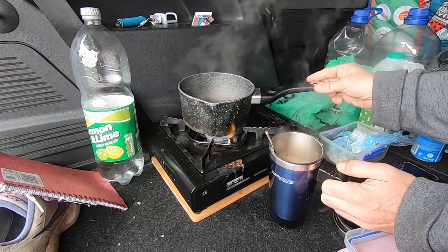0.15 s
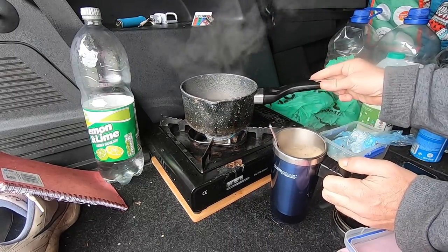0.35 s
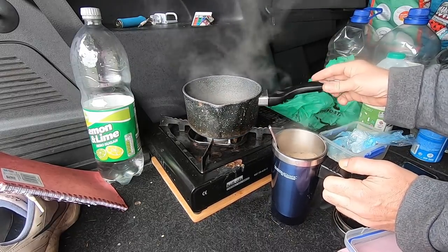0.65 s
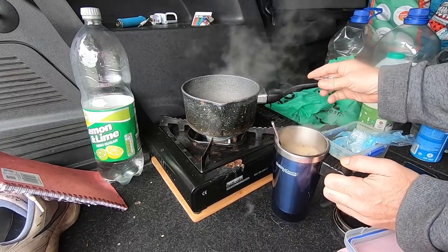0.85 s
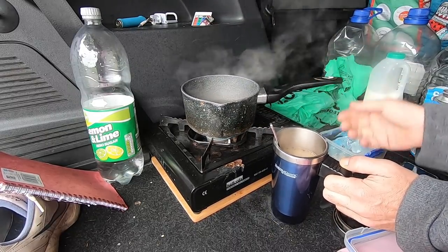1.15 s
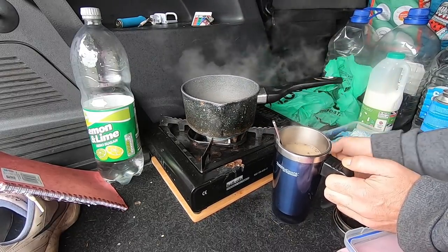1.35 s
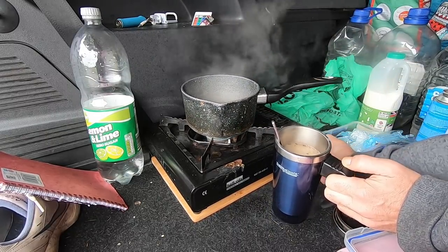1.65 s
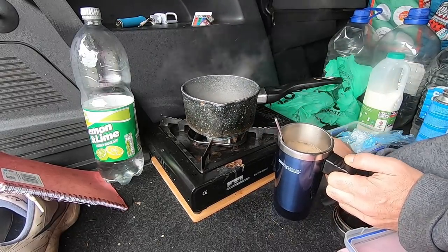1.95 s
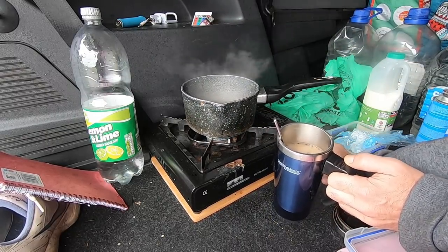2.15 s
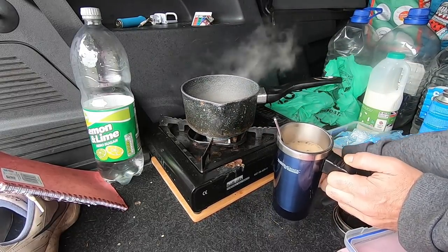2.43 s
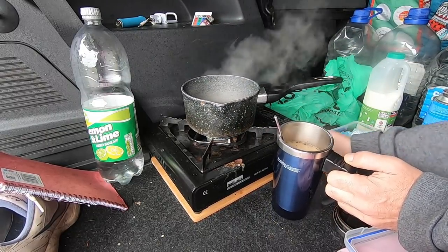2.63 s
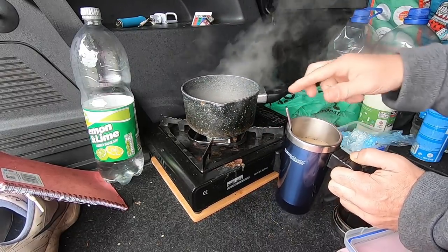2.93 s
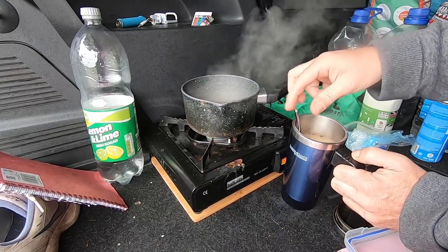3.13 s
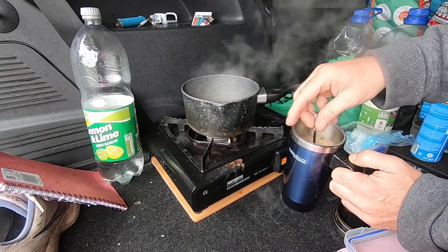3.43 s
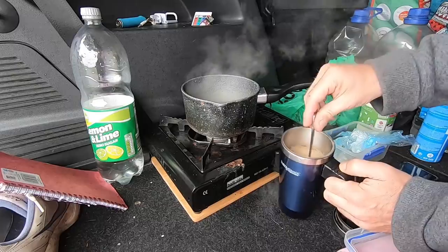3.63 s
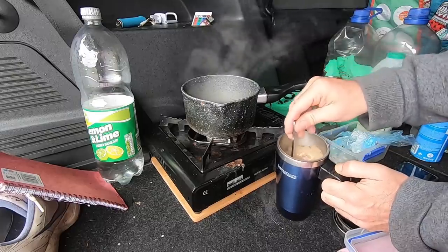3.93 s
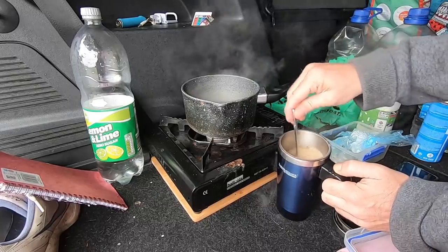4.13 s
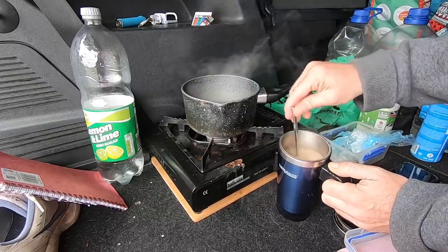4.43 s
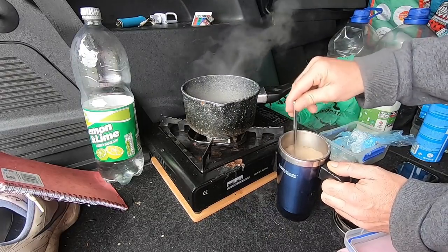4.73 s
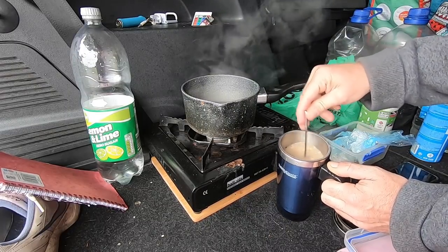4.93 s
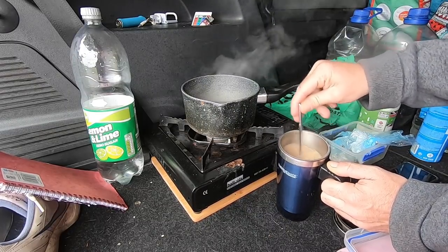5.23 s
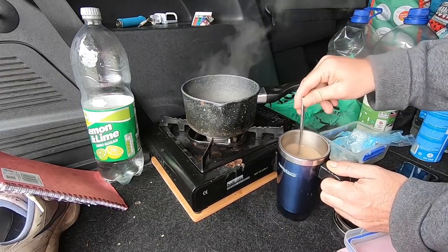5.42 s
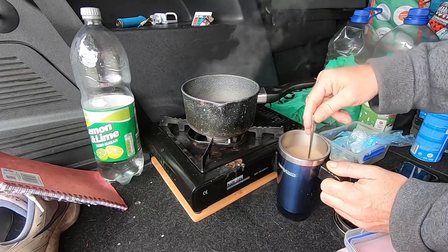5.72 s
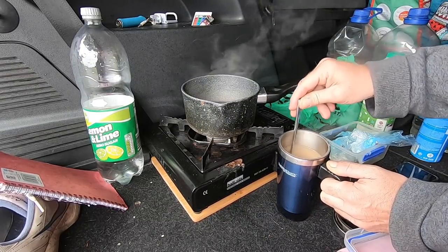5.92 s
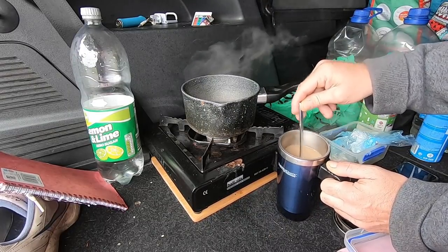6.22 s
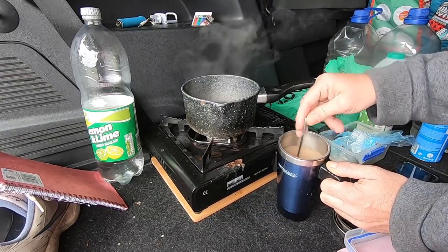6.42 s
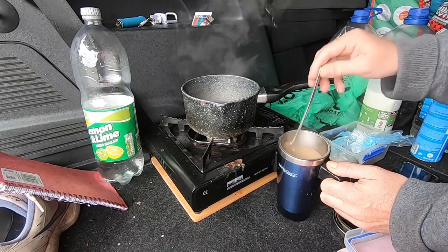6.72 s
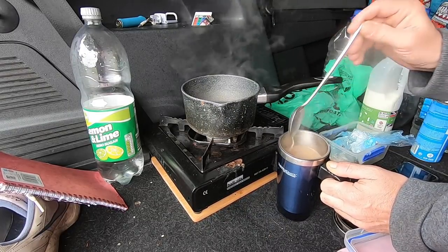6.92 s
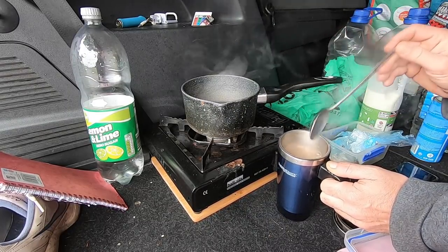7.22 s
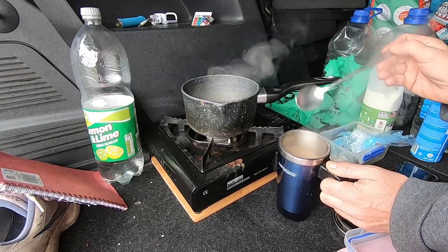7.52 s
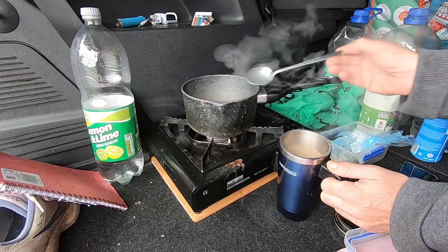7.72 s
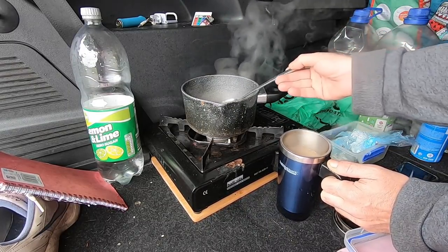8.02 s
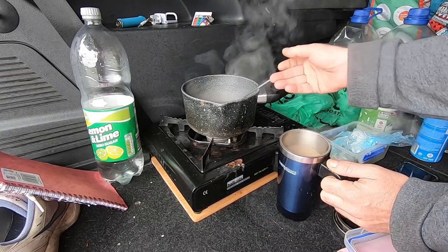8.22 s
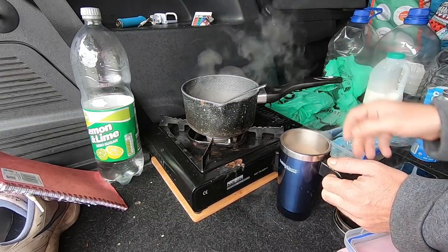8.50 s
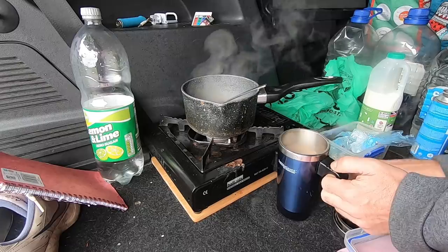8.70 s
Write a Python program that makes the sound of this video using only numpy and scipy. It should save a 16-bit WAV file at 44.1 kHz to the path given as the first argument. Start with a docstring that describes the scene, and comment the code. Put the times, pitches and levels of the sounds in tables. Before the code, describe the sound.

Close to a stereo microphone in a parked car's boot, a metal pan bumps and grates onto a camping stove during the first second, over a soft gas hiss. Around 2 seconds the knob clicks and the flame fades; at 2.6 a sprung lever snaps back, shaking the tin case. A sleeve brushes faintly just after 3 seconds. Slightly to the right, a spoon clinks in a steel mug and crunches through granules at about 3.8. From 4 to 7 seconds it stirs the drink, scraping, folding in small bubbles and knocking from wall to wall. Two ringing taps on the rim come at 7.2 and 7.5. From 8 to 8.6 seconds the spoon slides and clatters into the pan, slightly left. Underneath, the cabin air rumbles faintly and the floor gives a soft low boom with the knocks.

```python
"""A pan bumps and grates onto a hissing camping stove, close to a stereo microphone in a parked car's boot.
The knob turns, the flame dies and the sprung gas lever snaps back, shaking the tin case. A little to
the right a spoon crunches through granules in a steel mug and stirs, folding in bubbles and knocking
from wall to wall. It rings from two taps on the rim and is laid in the pan, on the left.
Under it all the cabin air rumbles faintly and the car floor booms with each blow."""
import sys
import numpy as np
from scipy import signal
from scipy.fft import rfft, irfft, next_fast_len
from scipy.io import wavfile

SR = 44100
rng = np.random.default_rng(int(sys.argv[2]) if len(sys.argv) > 2 else 0)


def inscribe(sig):
    """Save sig as 16-bit PCM at rate SR to the path in sys.argv[1].

    A 1-D sig is mono; a 2-D sig holds one channel per row.
    Samples are clipped to [-1, 1] before scaling.
    """
    pcm = np.round(np.clip(np.atleast_2d(sig).T, -1, 1) * 32767)
    wavfile.write(sys.argv[1], SR, pcm.astype(np.int16))


N = 390711

# Stereo width at the microphone: f/Hz, side minus mid/dB
STEREO_WIDTH = [(60, -5.5), (150, -2), (300, -12.5), (700, -6), (1500, -5), (4000, -12.5), (6000, -4.5),
                (8500, 0), (15000, 1)]
# Where each object stands before the microphone: name, left minus right/dB
LEFT_DB = {"pan": 1.8, "stove": .2, "mug": -3.4, "spoon": 2.8}
LOW_EDGE_HZ, HIGH_EDGE_HZ = 700, 3000   # borders of the low, middle and high registers

# Spectra of the still air, floor, sleeve and granules: f/Hz, relative level/dB
CABIN_COLOUR = [(15, -29.5), (25, 0), (95, -15), (186, -4.5), (573, -13.5), (856, -4.5), (1000, -16),
                (3730, -21.5), (15000, -41.5)]
BOOM_COLOUR = [(15, -34), (30, -17), (53, 0), (75, -6), (105, -10), (150, -26), (400, -70)]
SLEEVE_COLOUR = [(120, -61), (200, -13), (561, 5), (1690, -2.5), (2090, -15), (3380, -13), (6880, -32.5),
                 (14000, -67)]
GRANULE_COLOUR = [(53, -51), (90, -25), (276, 0.5), (350, 1.5), (515, -1), (883, -11), (1050, -1.5),
                  (2890, -6), (3580, 0.5), (4640, -11.5), (5510, -0.5), (7610, -19.5), (9440, -10),
                  (11500, -36), (15500, -38)]
# Each source's bed of dense resonances: f/Hz, relative level/dB
FLAME_COLOUR = [(53, -77), (90, -13), (157, 31.5), (488, 4), (579, -33), (870, 10.5), (969, -7),
                (1760, -1.5), (2480, -28.5), (3650, -34), (4520, -25), (9370, -26.5), (15000, -87.5)]
STOVE_COLOUR = [(53, -35.5), (90, -11.5), (222, -7), (350, -8.5), (494, -5), (538, -15.5), (828, -2),
                (1580, -2.5), (2710, -3), (9650, -24.5), (15500, -54)]
PAN_COLOUR = [(20, -29), (53, 3), (90, -0.5), (292, -5), (354, -0.5), (631, -7.5), (816, -1), (1250, -4),
              (1490, 0.5), (2010, -9), (3570, -17.5), (9500, -39.5), (12000, -57), (15000, -63)]
SPOON_PAN_COLOUR = [(53, -88), (90, -34), (301, -33.5), (365, -22.5), (639, -32), (846, -13), (1000, -23.5),
                    (1220, -14), (1690, -13.5), (2050, -20), (5510, -12), (7450, -19), (15500, -54.5)]
STIR_COLOUR = [(53, -59), (110, -53), (161, 6.5), (227, 8.5), (276, -4), (759, -14), (864, -47),
               (1580, -3.5), (1800, -12.5), (2710, 4), (4160, -6), (9240, -9), (15500, -40)]
MUG_COLOUR = [(47, -55.5), (80, -37.5), (162, 1.5), (287, -20.5), (569, -8.5), (1050, -9), (1260, 7.5),
              (1470, 6), (1790, -2), (1910, -7), (3100, -9), (4130, -15.5), (9340, -24), (15500, -59)]
RIM_COLOUR = [(53, -41.5), (90, -21.5), (165, -7.5), (328, -20), (398, -11), (483, -12.5), (793, -8.5),
              (1050, -14.5), (1220, 0.5), (1960, -16), (2140, -13), (2330, -22.5), (8480, -35),
              (15500, -67)]
# Damped resonances over that bed: f/Hz, width/Hz, relative level/dB
FLAME_PEAKS = [(182, 54, 18.5), (832, 300, -28.5), (1700, 350, -53), (3400, 790, -13)]
STOVE_PEAKS = [(840, 99, -7), (1130, 58, 1), (1710, 26, -14.5), (1910, 39, 1), (2700, 46, -15),
               (2970, 15, -1), (3870, 30, -8), (4250, 61, -12.5), (4970, 60, -16.5), (5940, 61, -15),
               (7000, 33, -13), (8400, 32, -26.5)]
PAN_PEAKS = [(369, 11, 2), (815, 33, -3), (1430, 64, 2), (1738, 32, -0.5), (2140, 19, -1.5),
             (2500, 18, -19.5), (2650, 10, -11), (2930, 43, -24), (3430, 32, -11.5), (3530, 57, -9),
             (3750, 120, -17.5), (3940, 63, -14)]
SPOON_PAN_PEAKS = [(910, 72, -14.5), (1685, 32, 1), (2530, 55, -6), (2930, 21, -34), (3610, 27, -3),
                   (4080, 53, -7), (4730, 91, -4), (5380, 140, -1.5), (5600, 45, -10), (6400, 46, -11),
                   (7030, 170, -8.5), (7640, 44, -17.5), (9000, 67, -33), (9200, 58, -11.5)]
STIR_PEAKS = [(398, 16, 0.5), (660, 170, -7.5), (967, 10, 4.5), (1575, 110, 3), (2190, 40, -5),
              (2798, 23, 8.5), (3270, 65, 2.5), (4550, 60, -0.5), (5190, 110, -3), (5710, 330, -4.5),
              (6450, 96, -13.5), (7000, 380, -11)]
MUG_PEAKS = [(182, 26, 3.5), (382, 70, 1.5), (555, 31, 1.5), (1350, 36, 8), (1454, 7.7, 12),
             (1930, 88, 0.5), (2330, 35, -5), (2290, 4, 7), (2606, 103, 2), (3264, 46, 1.5),
             (4680, 19, -1.5), (4960, 73, -20), (6640, 66, -11.5), (8800, 72, -42), (9745, 190, -17)]
RIM_PEAKS = [(411, 15, 0), (815, 65, -2.5), (1193, 39, -13), (1528, 46, 4), (1673, 14, -1), (2170, 31, -6),
             (3150, 67, -19), (4830, 34, -23), (5204, 50, -20), (7200, 130, -31), (8270, 32, -32.5),
             (9910, 80, -25.5)]
# Free ringing of struck metal: f/Hz, relative level/dB, t60/s
STOVE_MODES = [(363, 0, 0.34), (650, -11, 1.25), (785.7, -13.5, 1.4), (995, -3, 0.49), (1135, 0.5, 0.54),
               (1317, -0.5, 0.54), (1442, -1, 0.55), (1480, -8, 1.1), (1650, -4.5, 0.55),
               (2420, -3.5, 0.48), (2950, -10, 0.24), (3580, -19, 0.68), (3720, -20.5, 0.8),
               (4608, -11.5, 0.75), (6000, -21.5, 0.6), (6800, -24, 0.6)]
PAN_MODES = [(850, 9.5, 0.068), (1558, -10.5, 0.24), (3596, -32.5, 0.25), (4226, -24.5, 0.22),
             (4650, -4, 0.036), (5340, -33, 0.15), (5600, -24.5, 0.14), (6000, -11, 0.069)]
MUG_MODES = [(1206, 6, 0.079), (1565, -14, 0.18), (424, -37.5, 0.16), (796, -30.5, 0.19),
             (2120, -15, 0.088), (2663, -15.5, 0.11), (3580, -20, 0.076)]
SPOON_MODES = [(585, -10.5, 0.67), (780, -15, 0.81), (970, -0.5, 0.18), (1227, 5, 0.26), (1565, -6, 0.48),
               (1635, 0.5, 0.44), (1655, -2.5, .3), (2130, -16.5, .2), (2620, -1.5, .15), (2863, -3, 0.22),
               (3270, -1.5, 0.18), (3460, -5.5, 0.26), (4750, -2, .1), (8200, 2.5, 0.077)]

# Event levels below are relative: each source applies its own gain.
# Weight shifting on the car floor: t/s, level/dB
FLOOR_BUMPS = [(0.01, -45.5), (3.8, -45), (8.0, -48.5), (8.08, -51)]
# Strokes of friction or burning gas: t/s, length/s, low/dB, middle/dB, high/dB
SLEEVE_BRUSHES = [(3.12, 0.14, -57.5, -61.5, -54), (3.2, 0.055, -68, -62, -45)]
FLAME_BURN = [(0.0, 2.15, -67, -81.5, -72.5)]
KNOB_TURN = [(2.04, 0.068, -94, -59, -65)]
PAN_SHOVES = [(0.0, 0.017, -47, -53, -51), (0.15, 0.15, -31, -39, -40.5), (0.37, 0.16, -46, -56, -56.5),
              (0.49, 0.14, -38.5, -41.5, -45), (0.775, 0.065, -37, -41, -44), (1.01, 0.028, -44, -54, -60)]
SPOON_SLIPS = [(8.005, 0.022, -38.5, -42, -80), (8.06, 0.086, -57, -57, -88),
               (8.17, 0.12, -48.5, -47.5, -52), (8.3, 0.15, -39.5, -49, -46.5),
               (8.47, 0.058, -44, -45.5, -62)]
GRANULE_DIGS = [(3.78, 0.098, -64, -60, -48.5), (3.815, 0.069, -31.5, -39, -36),
                (3.895, 0.096, -52, -38.5, -31), (4.02, .04, -48, -42, -49),
                (4.125, 0.023, -49.5, -38.5, -50)]
# Blows on metal: t/s, low thud/dB, middle knock/dB, high crack/dB, ring/dB
STOVE_CLICKS = [(1.9246, -68, -53.5, -53.5, -67.5), (2.1466, -56, -40.5, -46, -71.5),
                (2.189, -51.5, -40, -37, -63), (2.255, -70, -66, -59.5, -79.5),
                (2.441, -66.5, -65, -72.5, -71.5), (2.5845, -37, -34, -29.5, -44),
                (2.591, -36.5, -27.5, -30, -31.5), (2.602, -31.5, -27, -25, -41),
                (2.612, -30, -22.5, -24.5, -55), (2.668, -49, -38.5, -33.5, -46.5),
                (2.695, -46.5, -31, -41.5, -40.5)]
PAN_ON_STOVE = [(0.004, -48, -40, -47, -52), (0.153, -39, -29.5, -32.5, -24), (0.168, -59, -42, -31.5, -25),
                (0.234, -38.5, -28.5, -44, -26.5), (0.2764, -36, -40, -48, -35),
                (0.298, -43, -41.5, -40, -62), (0.5308, -45, -51, -65, -34),
                (0.5707, -32.5, -30, -32.5, -23), (0.625, -39, -39, -42.5, -52),
                (0.7812, -37, -38, -49.5, -30), (0.8231, -38.5, -41.5, -61, -59),
                (1.0072, -44, -31.5, -41, -30), (1.027, -44.5, -55, -43.5, -61)]
SPOON_IN_PAN = [(8.0005, -40, -30, -39, -61), (8.1652, -64, -46.5, -54, -65), (8.2096, -52, -41, -52, -63),
                (8.2625, -38, -28.5, -21, -32), (8.2875, -49, -29, -22, -28), (8.297, -31, -27.5, -47, -51),
                (8.3613, -66.5, -57, -43, -44), (8.3852, -67, -66, -42.5, -57),
                (8.4625, -37, -26, -33, -14.5), (8.48, -42, -38, -31, -20), (8.5334, -57, -50, -50, -42),
                (8.5733, -64, -59, -58, -50), (8.7933, -80, -70, -82, -82.5),
                (8.806, -79, -59.5, -80, -75.5)]
SPOON_IN_MUG = [(3.0725, -53, -60.5, -65, -73), (3.4861, -49, -52, -52, -40),
                (3.6023, -47.5, -52, -55, -42), (3.9065, -46, -59, -35, -61), (3.994, -49, -59, -34.5, -47),
                (4.012, -44.5, -60, -36.5, -64), (4.154, -51, -45, -47, -54), (4.391, -32, -34.5, -34, -58),
                (4.4683, -41.5, -36.5, -40, -51), (4.6824, -30.5, -30, -36.5, -69),
                (4.7442, -57, -38, -40, -70), (4.756, -41.5, -45, -59, -53), (4.9667, -29, -44, -35, -55),
                (5.0236, -36.5, -62, -38.5, -62), (5.255, -42, -43, -47.5, -50),
                (5.289, -34.5, -33.5, -41, -30), (5.4187, -38.5, -28, -40, -24),
                (5.7255, -39.5, -31, -38, -43), (5.824, -39.5, -30, -40.5, -16),
                (6.1351, -37.5, -29.5, -34.5, -49), (6.2204, -42.5, -30.5, -40.5, -16),
                (6.4902, -40, -31.5, -36, -25.5), (6.6005, -39, -25.5, -40, -17.5),
                (6.833, -67, -53.5, -53.5, -61), (6.9457, -96, -60.5, -85, -78)]
RIM_TAPS = [(7.1998, -39.5, -27, -28, -43.5), (7.4727, -42.5, -24, -31, -47)]
# The contacts within one rim tap: t after the strike/s, level/dB, extra crack/dB
TAP_CONTACTS = [(-.0105, -25.5, -1.5), (0, -0.5, -1), (.0245, -18, 7.5), (.038, -25.5, 8.5)]
# Gulps of air behind the spoon: t/s, starting f/Hz, level/dB
AIR_GULPS = [(4.055, 611, -40), (4.082, 578, -37), (4.109, 566, -39), (4.178, 520, -47),
             (5.03, 1056, -34.5)]
# Sweeps of the spoon round the mug: t/s, length/s, level/dB, extra treble/dB
STIR_SWEEPS = [(4.162, 0.27, -52.5, -6.5), (4.33, .17, -49, -5.5), (4.557, 0.22, -47, -5.5),
               (4.844, 0.18, -43.5, -7), (5.145, 0.32, -46, -13), (5.709, 0.12, -44, -12),
               (6.109, 0.12, -43.5, -11.5), (6.456, 0.22, -47.5, -7.5), (6.693, 0.22, -54.5, 1.5)]
LIFTED_AT_S = 6.89   # the spoon leaves the drink


def from_db(db):
    return 10 ** (np.asarray(db) / 20)


def at_hz(points, hz):
    """A spectrum read on a log-frequency axis, as gain."""
    f, db = np.transpose(points)
    return from_db(np.interp(np.log(hz + 1), np.log(f), db))


def add(out, s, sound):
    """Mix a sound in from time s on."""
    at = max(0, round(s * SR))
    out[:, at:at + sound.shape[1]] += sound[:, :N - at]


def drift(rate, size):
    """A random wander with a spread near 1, turning rate times a second."""
    knots = rng.standard_normal(2000)
    return np.interp(np.arange(size) / SR * rate, np.arange(len(knots)), knots)


def swell(t, length_s, attack_s, release_s):
    """Attack, hold until length_s, then a release that falls 60 dB in release_s."""
    rise = np.sin(np.pi / 2 * np.clip(t / attack_s, 0, 1)) ** 2
    return rise * from_db(-60 * np.maximum(t - length_s, 0) / release_s)


def body(hz, colour, peaks, dense_db):
    """Response of an object: a few clear resonances over a bed of dense ones."""
    power = (at_hz(colour, hz) * from_db(dense_db)) ** 2
    for centre, width, db in peaks:
        detune = centre / width * ((hz + 1) / centre - centre / (hz + 1))
        power = power + from_db(db) ** 2 / (1 + detune ** 2 / 2) ** 2
    return np.sqrt(power)


def ragged(hz, depth_db=4.5, spacing_hz=90):
    """Where an object is touched favours some of its many small modes and mutes others."""
    knots = rng.standard_normal(1000)
    ripple = np.interp(hz / spacing_hz, np.arange(len(knots)), knots)
    return from_db(depth_db * ripple * hz / (hz + 1500))


def registers(hz):
    """Low, middle and high shares of a sound; their powers sum to one."""
    low = 1 / (1 + (hz / LOW_EDGE_HZ) ** 6)
    high = 1 - 1 / (1 + (hz / HIGH_EDGE_HZ) ** 6)
    return np.sqrt([low, np.maximum(1 - low - high, 0), high])


def causal(gain):
    """Minimum-phase filter of a given gain: nothing sounds before the blow."""
    cepstrum = irfft(np.log(gain + 1e-9))
    half = len(cepstrum) // 2
    cepstrum[1:half] *= 2
    cepstrum[half + 1:] = 0
    return np.exp(rfft(cepstrum))


def stereo(spectra, hz):
    """Left and right waves from mid and side spectra; the treble is widest."""
    mid, side = irfft(spectra[0]), irfft(spectra[1] * at_hz(STEREO_WIDTH, hz))
    return np.array([mid + side, mid - side])


def placed(x, left_db):
    """Louder by left_db on the microphone's left; negative leans right."""
    return x * from_db([[left_db / 2], [-left_db / 2]])


def steady(colour):
    """Even stereo noise of a given colour, rms 1."""
    size = 2 * next_fast_len(N // 2 + 1)
    hz = np.fft.rfftfreq(size, 1 / SR)
    wave = stereo(rfft(rng.standard_normal((2, size))) * at_hz(colour, hz), hz)[:, :N]
    return wave / np.std(wave)


def blows(rows, colour, peaks, modes, dense_db, click_db, rise_s, t60, tail_db, tail_t60, ring_db):
    """Each contact is a click and its scatter in the cabin, coloured by the object, which rings on."""
    size, blow_s = 32768, .03   # a blow's level is the rms of its energy spread over blow_s
    out, t, hz = np.zeros((2, N)), np.arange(size) / SR, np.fft.rfftfreq(size, 1 / SR)
    resonances, shares = body(hz, colour, peaks, dense_db), registers(hz)
    ring_t = np.arange(SR) / SR
    ring = sum(from_db(db - 60 * ring_t / decay) * np.sin(2 * np.pi * f * ring_t)
               for f, db, decay in modes)
    ring *= 1 - np.exp(-ring_t / 0.0049)
    lasting = np.array([[1.3], [1], [.65]])   # low scatter lasts longest, high dies first
    scatter = (1 - np.exp(-t / rise_s)) * from_db(-60 * t / (t60 * lasting))
    for s, thud_db, knock_db, crack_db, mode_db in rows:
        response = resonances * ragged(hz)
        early, late = rng.standard_normal((2, 2, size))
        burst = np.sum(rfft(early[:, None] * scatter) * shares, axis=1)
        burst[0] += from_db(click_db) * np.linalg.norm(scatter[1])   # direct click, mid only
        tail = rfft(late * from_db(tail_db - 60 * t / tail_t60))
        burst += tail / np.hypot(1, hz / 3000)   # upholstery dulls the tail
        energy = np.mean(np.abs(burst[0] * response * shares) ** 2, axis=1)
        strength = from_db([thud_db, knock_db, crack_db]) ** 2 * blow_s * SR / energy
        knock = stereo(burst * causal(response * np.sqrt(strength @ shares ** 2)), hz)
        add(out, s, knock[:, :SR // 2])
        add(out, s, from_db(mode_db + ring_db) * ring[None])
    return out


def rub(strokes, colour, peaks, dense_db, grains_per_s, grain_db, uneven_db,
        attack_s, release_s, treble_release_s):
    """Friction or a jet: grainy noise coloured by the object, swelling with each stroke."""
    starts, lengths, *levels = np.transpose(strokes)
    start = max(starts.min(), 0)
    size = 2 * next_fast_len(int((np.max(starts + lengths) + .5 - start) * SR / 2))
    t, hz = start + np.arange(size) / SR, np.fft.rfftfreq(size, 1 / SR)
    grains = rng.standard_normal((2, N))[:, :size] * from_db(grain_db * drift(grains_per_s, size))
    source = rfft(grains) * causal(body(hz, colour, peaks, dense_db) * ragged(hz))
    out = np.zeros((2, N))
    for share, db, release in zip(registers(hz), levels, (release_s, release_s, treble_release_s)):
        wave = stereo(source * share, hz) * from_db(uneven_db * drift(45, size))   # the pressure wavers
        swells = swell(t - starts[:, None], lengths[:, None], attack_s, release)
        effort = np.sqrt(from_db(db) ** 2 @ swells ** 2)
        add(out, start, wave / np.std(wave.mean(axis=0)) * effort)
    return out


def cabin():
    """Still air all round the microphone, and a sleeve brushing past beside the mug."""
    sleeve = rub(SLEEVE_BRUSHES, SLEEVE_COLOUR, [], dense_db=0, grains_per_s=90, grain_db=-0.5,
                 uneven_db=3, attack_s=0.02, release_s=0.32, treble_release_s=0.11)
    return from_db(-72.5) * steady(CABIN_COLOUR) + placed(from_db(-4.5) * sleeve, LEFT_DB["mug"])


def shaking(rows, boom_db, hold_s, attack_s, release_s):
    """Power of the floor's boom, boom_db relative to each thud: it swells and dies away."""
    power, t = np.zeros((1, N)), np.arange(SR) / SR
    shape = swell(t, hold_s, attack_s, release_s)[None]
    for s, thud_db, *_ in rows:
        add(power, s, (from_db(thud_db + boom_db) * shape) ** 2)
    return power


def floor_boom():
    """The boot floor booms long under the stove, briefly under the hand-held mug."""
    power = (shaking(PAN_ON_STOVE, boom_db=-16, hold_s=0.073, attack_s=0.064, release_s=0.33)
             + shaking(STOVE_CLICKS, boom_db=-12, hold_s=0.034, attack_s=0.033, release_s=0.51)
             + shaking(SPOON_IN_MUG, boom_db=-22, hold_s=0.032, attack_s=0.014, release_s=0.19)
             + shaking(RIM_TAPS, boom_db=-15, hold_s=0.032, attack_s=0.012, release_s=0.26)
             + shaking(SPOON_IN_PAN, boom_db=-27.5, hold_s=0.04, attack_s=0.015, release_s=0.33)
             + shaking(FLOOR_BUMPS, boom_db=0, hold_s=0.054, attack_s=0.04, release_s=0.15))
    return placed(np.sqrt(power) * steady(BOOM_COLOUR), left_db=-3.5)


def stove():
    """Straight ahead, the flame hisses until the knob clicks off; the sprung lever shakes the case."""
    flame = rub(FLAME_BURN, FLAME_COLOUR, FLAME_PEAKS, dense_db=-1, grains_per_s=100, grain_db=0.5,
                uneven_db=1, attack_s=0.005, release_s=0.9, treble_release_s=0.6)
    turn = rub(KNOB_TURN, STOVE_COLOUR, STOVE_PEAKS, dense_db=-3, grains_per_s=93, grain_db=-3,
               uneven_db=3.5, attack_s=0.053, release_s=0.35, treble_release_s=0.3)
    clicks = blows(STOVE_CLICKS, STOVE_COLOUR, STOVE_PEAKS, STOVE_MODES, dense_db=-4, click_db=-17,
                   rise_s=0.00055, t60=0.14, tail_db=-15, tail_t60=0.43, ring_db=-2.5)
    return placed(flame + turn + from_db(0.78) * clicks, LEFT_DB["stove"])


def pan():
    """Just left of centre, the pan bumps and grates over the prongs of the burner."""
    bumps = blows(PAN_ON_STOVE, PAN_COLOUR, PAN_PEAKS, PAN_MODES, dense_db=-3.5, click_db=-7.5,
                  rise_s=0.0015, t60=0.14, tail_db=-20, tail_t60=0.36, ring_db=-9.5)
    grating = rub(PAN_SHOVES, PAN_COLOUR, PAN_PEAKS, dense_db=9, grains_per_s=210, grain_db=1.5,
                  uneven_db=2, attack_s=0.015, release_s=0.37, treble_release_s=0.36)
    return placed(from_db(-0.5) * bumps + from_db(-8) * grating, LEFT_DB["pan"])


def spoon_laid_down():
    """On the left, the spoon touches the pan, slides down its wall and drops against the rim."""
    touches = blows(SPOON_IN_PAN, SPOON_PAN_COLOUR, SPOON_PAN_PEAKS, PAN_MODES, dense_db=2.5,
                    click_db=-27, rise_s=0.0004, t60=0.1, tail_db=-17.5, tail_t60=0.2, ring_db=0.5)
    slide = rub(SPOON_SLIPS, SPOON_PAN_COLOUR, SPOON_PAN_PEAKS, dense_db=1.5, grains_per_s=140,
                grain_db=1.5, uneven_db=4, attack_s=0.022, release_s=0.3, treble_release_s=0.15)
    return placed(from_db(-4) * touches + from_db(-6.5) * slide, LEFT_DB["spoon"])


def bubbles(rows, cycles, glide):
    """Pockets of air ring for some cycles and glide in pitch as they move in the drink."""
    out, t = np.zeros((2, N)), np.arange(SR // 5) / SR
    for s, hz, db in rows:
        phase = 2 * np.pi * np.cumsum(hz * (1 + glide * t)) / SR
        envelope = from_db(db - 60 * t * hz / cycles) * (1 - np.exp(-t / 0.0027))
        add(out, s, (envelope * np.sin(phase))[None])
    return out


def froth(froth_db=7.5, low_hz=1200, high_hz=5000, settle_s=0.2, settle_db=12, per_sweep=36):
    """Each sweep folds in small bubbles, fainter as the drink settles, until the spoon is lifted."""
    rows = []
    for s, length, db, _ in STIR_SWEEPS:
        when, pitch, faintness = rng.random((per_sweep, 3)).T
        age = when * min(length + settle_s, LIFTED_AT_S - s)
        level = db + froth_db - 14 * faintness - settle_db * np.maximum(age - length, 0) / settle_s
        rows += zip(s + age, low_hz * (high_hz / low_hz) ** pitch, level)
    return bubbles(rows, cycles=130, glide=1.2)


def stirring(slosh_db=-8.5, echo_s=0.0016, swing=0.25, echo_db=-3, lift_s=0.14):
    """The spoon scrapes round the steel floor; its echo off the wall swings in delay once a turn."""
    sweeps = [(s, length, db + slosh_db, db, db + treble_db) for s, length, db, treble_db in STIR_SWEEPS]
    scrape = rub(sweeps, STIR_COLOUR, STIR_PEAKS, dense_db=-3.5, grains_per_s=330, grain_db=3,
                 uneven_db=0.5, attack_s=0.056, release_s=0.92, treble_release_s=0.62)
    t, starts = np.arange(N) / SR, np.array(STIR_SWEEPS)[:, 0]
    turns = np.interp(t, starts, np.arange(len(starts)))
    lag = echo_s * (1 + swing * np.sin(2 * np.pi * turns))
    echo = np.array([np.interp(t - lag, t, side) for side in scrape])
    in_drink = from_db(-60 * np.maximum(t - LIFTED_AT_S, 0) / lift_s)
    return (scrape + from_db(echo_db) * echo) / np.hypot(1, from_db(echo_db)) * in_drink


def rim_taps():
    """At each tap the spoon grazes the rim, strikes, bounces twice and rings."""
    contacts = [(s + lag, thud + db, knock + db, crack + db + extra_db, ring + db)
                for s, thud, knock, crack, ring in RIM_TAPS for lag, db, extra_db in TAP_CONTACTS]
    return blows(contacts, RIM_COLOUR, RIM_PEAKS, SPOON_MODES, dense_db=0, click_db=-6.5,
                 rise_s=0.00048, t60=0.045, tail_db=-26, tail_t60=0.29, ring_db=5.5)


def mug():
    """Close on the right, the spoon crunches granules, stirs, hits the walls and is tapped dry."""
    crunch = rub(GRANULE_DIGS, GRANULE_COLOUR, [], dense_db=0, grains_per_s=500, grain_db=2.5,
                 uneven_db=4, attack_s=0.027, release_s=0.23, treble_release_s=0.25)
    circling = stirring()
    walls = blows(SPOON_IN_MUG, MUG_COLOUR, MUG_PEAKS, MUG_MODES, dense_db=4, click_db=-18.5,
                  rise_s=0.0036, t60=0.042, tail_db=-27.5, tail_t60=0.5, ring_db=1)
    taps = rim_taps()
    liquid = froth() + bubbles(AIR_GULPS, cycles=84, glide=-0.77)
    drink = from_db(-5) * crunch + from_db(-3.5) * circling + liquid
    return placed(drink + from_db(-2.5) * walls + from_db(1.6) * taps, LEFT_DB["mug"])


def scene():
    """Everything in the boot as it reaches the microphone."""
    return pan() + stove() + mug() + spoon_laid_down() + cabin() + floor_boom()


def record(dry):
    """The microphone chain cuts the top steeply above 15.6 kHz."""
    return signal.sosfilt(signal.ellip(10, .1, 80, 15600, fs=SR, output="sos"), dry)


dry = scene()
out = record(dry)
inscribe(out)
```